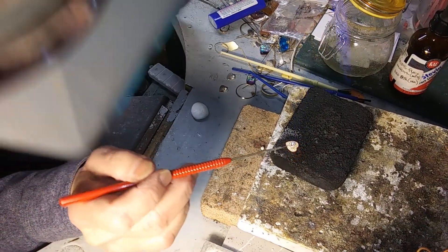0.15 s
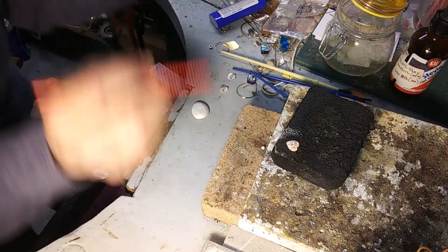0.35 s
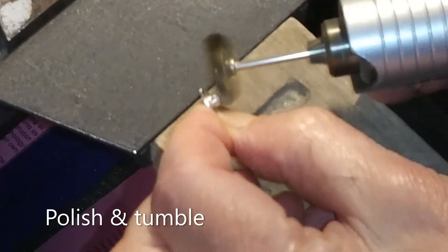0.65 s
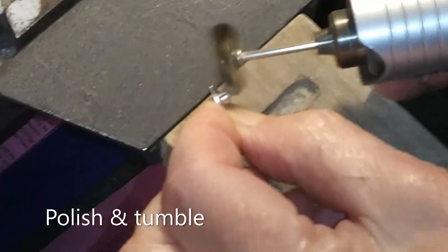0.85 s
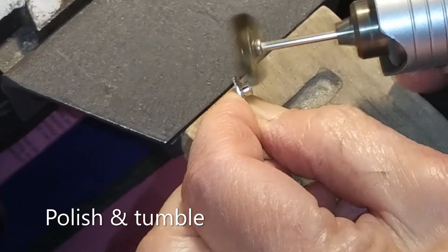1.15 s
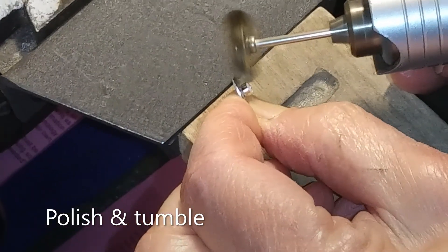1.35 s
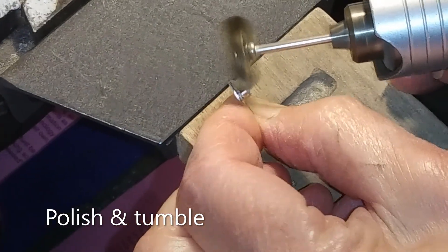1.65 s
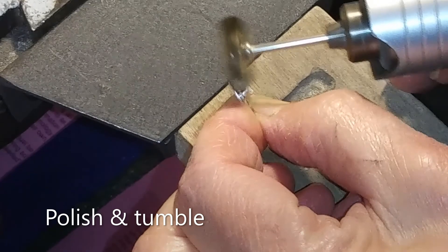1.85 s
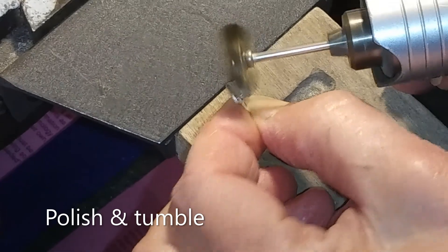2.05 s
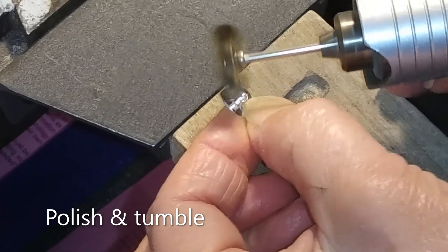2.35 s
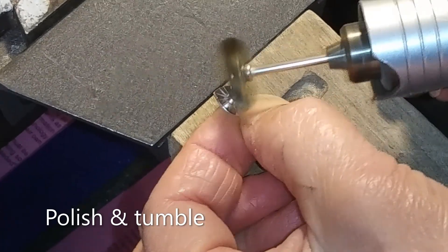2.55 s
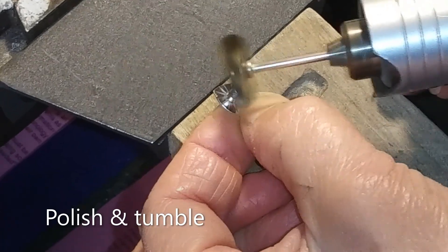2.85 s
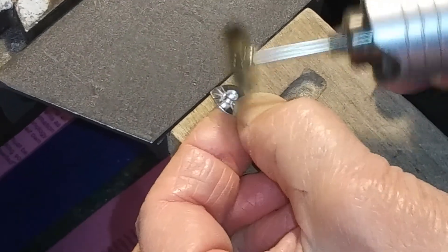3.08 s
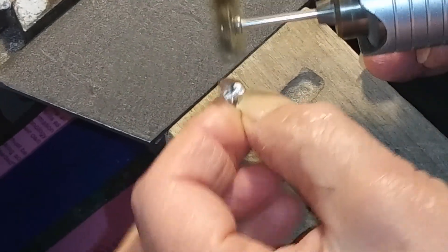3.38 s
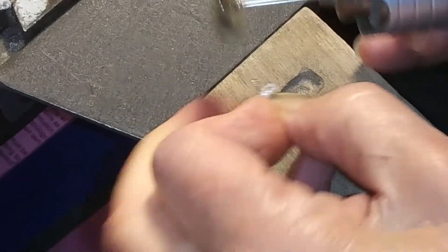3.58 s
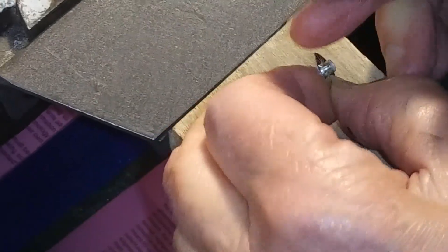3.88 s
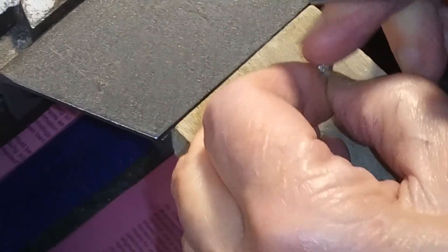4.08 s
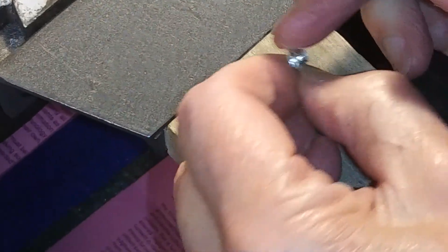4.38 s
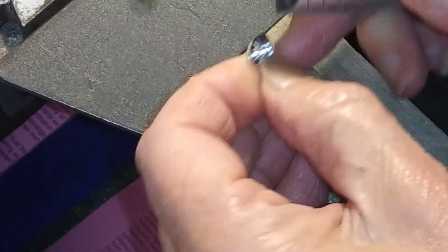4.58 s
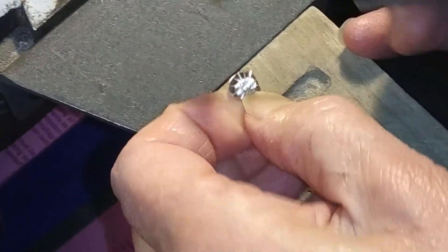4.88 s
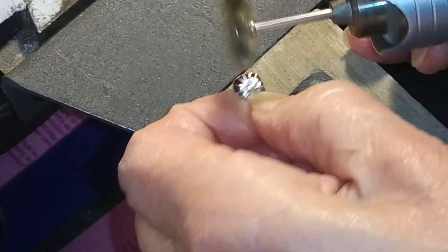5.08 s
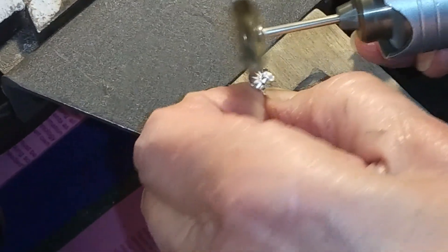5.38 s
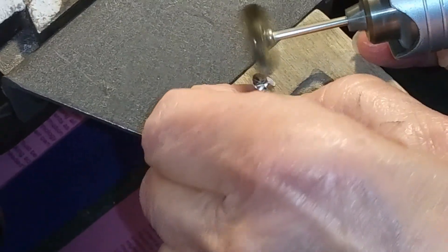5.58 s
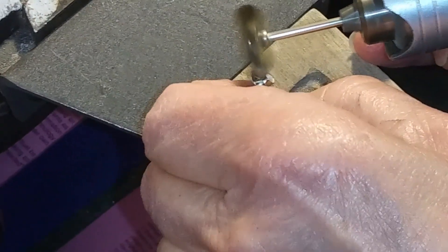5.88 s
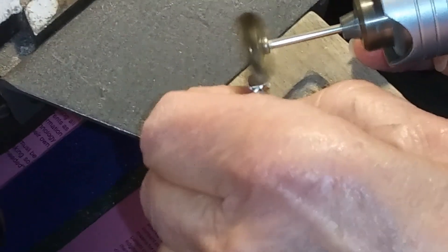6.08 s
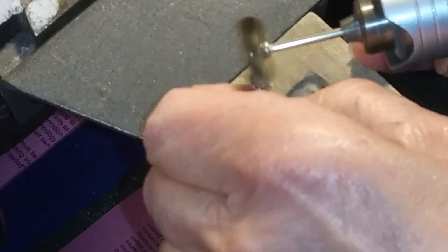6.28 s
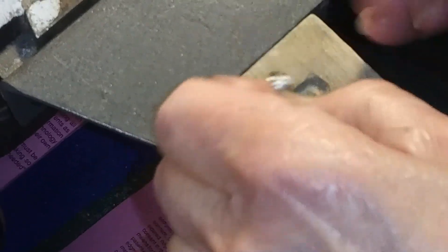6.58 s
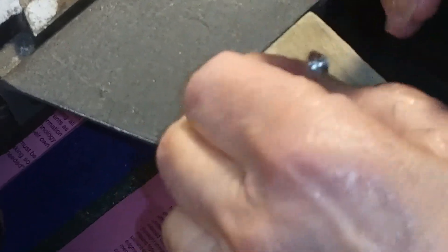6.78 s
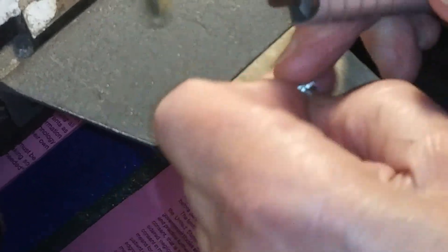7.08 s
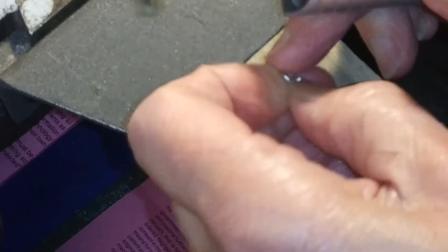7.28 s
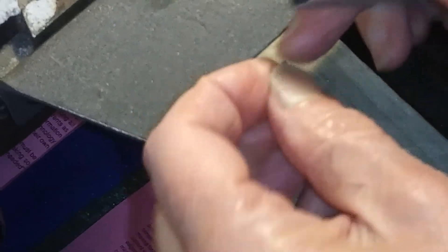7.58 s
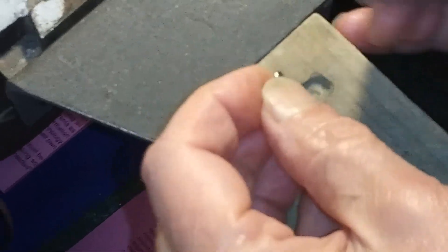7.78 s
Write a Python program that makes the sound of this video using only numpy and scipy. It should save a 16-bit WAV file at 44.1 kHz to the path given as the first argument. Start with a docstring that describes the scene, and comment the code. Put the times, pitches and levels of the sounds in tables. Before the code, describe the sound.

Brief whistling torch hiss gives way to a steady, bright rotary-tool whine that coasts lower, climbs partway again and glides down, with soft knocks.

```python
"""A pedal-driven flexible-shaft tool spins a small brush against a silver setting on a jeweller's bench.
Its motor buzzes with bursts of mains current, coasts, is driven again and coasts; noise and tones locked
to the shaft angle ring the housing, the bearings, the spindle, the brush and the sheath.
Dull knocks, made of decaying modes, fall in between. Before the tool, a gas torch rushes for half a second:
coloured noise with thin, wavering whistles."""
import sys
import numpy as np
from scipy import signal
from scipy.fft import rfft, irfft, next_fast_len
from scipy.io import wavfile
from scipy.ndimage import uniform_filter1d

SR = 44100
rng = np.random.default_rng(int(sys.argv[2]) if len(sys.argv) > 2 else 0)


def transcribe(u):
    """Save the signal u as a 16-bit wav file named by the first command-line argument.

    u: samples, shape (n,) or (channels, n), limited to [-1, 1]; the rate is SR.
    q: integer samples, one column per channel.
    """
    v = np.clip(np.atleast_2d(u).T, -1, 1)
    q = np.round(v * 32767).astype(np.int16)
    wavfile.write(sys.argv[1], SR, q)


N = 350154
TIME = np.arange(N) / SR
FULL_SPEED = 91.55   # turns per s


def from_db(db):
    """Decibels to gain."""
    return 10 ** (np.asarray(db) / 20)


def rms_one(x):
    """Scale to unit power."""
    return x / np.sqrt(np.mean(x ** 2) + 1e-20)


def in_time(rows):
    """Each column of a curve, at every sample."""
    s, *columns = np.transpose(rows)
    return [np.interp(TIME, s, column) for column in columns]


def held(rows, ramp_s):
    """Sum of rows (from s, to s, strength): each ramps up, holds and ramps down."""
    total = np.zeros(N)
    for start, end, strength in rows:
        to_edge_s = np.minimum(TIME - start, end - TIME)
        total += strength * np.clip(to_edge_s / ramp_s + .5, 0, 1)
    return total


def drift(rate_hz):
    """Smooth random curve of spread 1 that changes about rate_hz times a second."""
    step = 40   # samples between points of the curve
    r = np.exp(-2 * step * np.pi * rate_hz / SR)
    noise = rng.standard_normal(N // step + 2002)
    slow = signal.lfilter([1], [1, -2 * r, r * r], noise)[2000:]
    return np.interp(np.arange(N) / step, np.arange(len(slow)), rms_one(slow))


def colour(x, spectrum, peaks=()):
    """Filter by a spectrum (Hz, dB), 60 dB per octave steeper outside it, plus peaks (Hz, width Hz, dB)."""
    size = next_fast_len(N + 4096)
    hz = np.maximum(np.arange(size // 2 + 1) * SR / size, 1)
    points_hz, levels_db = np.transpose(spectrum)
    db = np.interp(np.log(hz), np.log(points_hz), levels_db)
    db -= 60 * np.abs(np.log2(hz / np.clip(hz, points_hz[0], points_hz[-1])))
    for centre_hz, width_hz, gain_db in peaks:
        db += gain_db / (1 + (2 * (hz - centre_hz) / width_hz) ** 2)
    return irfft(rfft(x, size) * from_db(db), size)[:N]


def tones(turns, rows, size=65536):
    """Partials (multiple of the speed, dB) locked to a shaft's angle; the pattern recurs every ten turns."""
    multiple, db = np.transpose(rows)
    lines = np.zeros(size // 2 + 1, complex)
    random_phase = np.exp(2j * np.pi * rng.random(len(db)))
    lines[np.round(10 * multiple).astype(int)] = from_db(db) * random_phase
    pattern = irfft(lines) * size / np.sqrt(2)
    return np.interp(turns / 10 % 1 * size, np.arange(size), pattern)


def swelling(turns, rows, flutter_db, count=4):
    """Partials dealt into groups, each with its own random swell."""
    total = np.zeros(N)
    for k in range(count):
        swell_db = flutter_db * np.clip(drift(14), -2.5, 1.2)
        total += from_db(swell_db) * tones(turns, rows[k::count])
    return total


def level_at(speed, full_speed_db, db_per_doubling):
    """A level in dB that follows the logarithm of speed."""
    return full_speed_db + db_per_doubling * np.log2(speed / FULL_SPEED)


def torch(flame_db=-31, flutter_db=0.5, waver_hz=2.4, whistle_flutter_db=0.2):
    """Turbulent gas rushes from the nozzle, whose edge whistles."""
    # Each row: Hz, dB per Hz.
    spectrum = [(53, -65), (90, -31.5), (259, -5.5), (321, -7.5), (494, 0), (1270, -2), (1360, -2),
                (1650, -4.5), (2380, -18), (2890, -5.5), (3360, -19.5), (3900, -22), (4740, -17),
                (5280, -25), (10000, -28.5), (15500, -39)]
    # Extra flame peaks. Each row: centre in Hz, width in Hz, gain in dB.
    flame_peaks = [(503, 160, 1), (1315, 240, -13.5), (1620, 520, 8), (2420, 270, 5.5), (3030, 340, -2.5),
                   (3850, 820, 9)]
    # Each row: Hz, level in dB.
    whistles = [(1244, -46.5), (2902.5, -37), (4354, -61)]
    rush = rms_one(colour(rng.standard_normal(N), spectrum, flame_peaks))
    sound = from_db(flame_db + flutter_db * drift(25)) * rush
    for hz, db in whistles:
        phase = 2 * np.pi * np.cumsum(hz + waver_hz * drift(30)) / SR
        gain = from_db(db + whistle_flutter_db * drift(28))
        sound += np.sqrt(2) * gain * np.sin(phase)
    return sound


def knocks(contact_s=0.0031, low_cut_hz=640.0):
    """Soft blows set a few low modes ringing; the body is too small to radiate bass."""
    # Each row: time in seconds, strength in dB.
    blow_rows = [(3.189, -21), (3.762, -34.5), (4.735, -44), (5.095, -44), (5.376, -37.5), (6.493, -32),
                 (6.545, -40), (7.854, -41)]
    # Each row: mode in Hz, relative level in dB, 60 dB decay time in seconds.
    modes = [(613, -9, 0.19), (696, 6.5, 0.067), (732, -7, 0.15), (900, -10, 0.046)]
    blows, out = np.zeros(N), np.zeros(N)
    for s, db in blow_rows:
        blows[round(s * SR)] = from_db(db)
    for hz, db, t60_s in modes:
        w = 2 * np.pi * hz / SR
        ring_r = from_db(-60 / (t60_s * SR))
        contact_r = np.exp(-1 / (contact_s * SR))
        # subtracting a faster decay makes the ring build up during the contact
        for share, r in ((0.73, ring_r), (-0.57, contact_r)):
            ring = signal.lfilter([0, np.sin(w)], [1, -2 * r * np.cos(w), r * r], blows + 1e-18)
            out += share * from_db(db) * ring
    return signal.sosfilt(signal.butter(3, low_cut_hz, "high", fs=SR, output="sos"), out)


def thrum(turns, force, full_force_db=-58):
    """Under load the bent shaft shakes the bench twice a turn."""
    return from_db(full_force_db) * force * np.sqrt(2) * np.sin(4 * np.pi * turns)


def sheath(turns, coasting, flutter_db=4.5, coasting_db=-59.5, driven_db=-60.5, ramp_s=0.087):
    """Slow bearing tones swell as they glide through the sheath's resonances, more when the shaft coasts."""
    # Each row: multiple of the speed, relative level in dB.
    slow_tones = [(17.7, 0), (20.9, -2), (28.7, -4), (39.4, -3), (54.4, -3)]
    # Sheath resonances. Each row: Hz, dB.
    resonances = [(1040, -24), (1140, -5), (1290, 0), (1380, -12), (1600, -16), (1760, 0), (1900, -20),
                  (2550, -30), (2750, -14), (2860, 2), (3000, -16), (3600, -28), (3850, -14), (3960, 2),
                  (4080, -16)]
    # The sheath sings out. Each row: start in seconds, end in seconds, added gain in dB.
    swells = [(4.624, 4.8, -55.5), (6.72, 7.157, -52)]
    gain = from_db(driven_db + coasting * (coasting_db - driven_db))
    gain = gain + held([(start, end, from_db(db)) for start, end, db in swells], ramp_s)
    return gain * from_db(flutter_db * drift(15.6)) * colour(tones(turns, slow_tones), resonances)


def brush_shudder(speed, coasting, critical_speed=65.4, half_width=6.1):
    """Coasting through its critical speed (turns per s), the brush shudders: strength 0-1."""
    return coasting * np.exp(-((speed - critical_speed) / half_width) ** 2)


def squeal(turns, speed, coasting, level_db=-42.0):
    """The shuddering brush sings high tones that sweep down with the speed."""
    # Each row: multiple of the speed, relative level in dB.
    squeal_tones = [(160.3, 0), (155.9, -6), (166.1, -9)]
    return from_db(level_db) * brush_shudder(speed, coasting) * tones(turns, squeal_tones)


def hiss_dips(db_per_s=1050, shortest_s=.008):
    """Gain that drops for a moment at each dip, the longer the deeper."""
    # Each row: centre in seconds, length at half depth in seconds.
    dip_rows = [(0.872, .017), (0.934, .019), (1.384, .02), (2.237, .019), (3.497, .019), (3.54, .015),
                (3.857, .018), (4.17, .016), (4.393, .019), (4.523, .014), (4.692, .045), (5.67, .018),
                (5.713, .016), (5.846, .015), (5.905, .015), (6.055, .016), (6.163, .018), (6.202, .016),
                (6.793, .03), (6.897, .027), (6.994, .017), (7.125, .015), (7.166, .016), (7.225, .015),
                (7.292, .015)]
    loss_db = np.zeros(N)
    for s, length_s in dip_rows:
        fourth_power = np.square(np.square(2 * (TIME - s) / length_s))
        shape = np.exp(-np.minimum(fourth_power, 20) * np.log(2))
        loss_db += db_per_s * (length_s - shortest_s) * shape
    return from_db(-loss_db)


def race_tones(turns, pit_db=-23.5, pit_tilt_db=-6.5, pit_flutter_db=2.5, count=130):
    """The balls find small pits: faint tones that come and go, weaker with every octave."""
    multiple = rng.uniform(45, 200, count)
    db = pit_db + pit_tilt_db * np.log2(multiple / 80)
    return swelling(turns, np.column_stack([multiple, db]), pit_flutter_db)


def handpiece_levels(speed, force, coasting, pressed_db=2.5, shudder_db=3):
    """Levels in dB of bearings, spindle, brush and brush edge, from time, speed and load."""
    # Spindle ring. Each row: time in seconds, level in dB.
    spindle_ring = [(1.6, -47), (2, -41.5), (3.6, -39.5), (4.5, -43.5), (4.9, -42), (6.9, -41), (7.1, -45)]
    return [level_at(speed, -37.5, -8),
            in_time(spindle_ring)[0] + pressed_db * force ** 2,
            level_at(speed, -39, 8.5) + shudder_db * brush_shudder(speed, coasting),
            level_at(speed, -40, 12.6)]


def handpiece(turns, speed, levels_db, dips, throb=0.047, count=10):
    """Balls roll over pitted races: noise and gliding tones ring the bearings, spindle and brush."""
    # Each row: multiple of the speed, relative level in dB; the first ten hold through the dips.
    bearing_tones = [(67.3, -3), (78.7, -7), (96.3, -6), (111.6, -5), (118.6, -8), (142.8, -6), (156.6, -7),
                     (160.3, -4), (166.2, -7), (103.6, -8), (75.1, -6), (87.7, -8), (52.2, -12),
                     (58.7, -12), (63.2, -13), (64.3, -11), (65.3, -9), (66.3, -9), (72.5, -11),
                     (76.4, -11), (77.7, -10), (82.9, -9), (85.3, -11), (89.7, -11), (92.1, -9),
                     (93.2, -11), (98.5, -9), (107.5, -9), (121.7, -9), (127.6, -9), (132.1, -9),
                     (134.7, -8), (145.3, -9), (175, -3), (69.8, -13)]
    # Strength of the bearing tones. Each row: time in seconds, gain.
    whine_strength = [(.5, .78), (1.5, .72), (1.9, .52), (3.2, .46), (3.7, .36), (4.7, .32), (5.2, .16),
                      (6, .3), (6.5, .33), (7.2, .31), (7.9, .13)]
    # Spectra of the four ringing parts. Each row: Hz, dB per Hz.
    bearings = [(3000, -121.5), (4300, -9.5), (5000, -2.5), (5650, -1.5), (5950, 4), (6250, 5), (6500, 3),
                (6850, 8.5), (7250, 6.5), (7650, 3.5), (8050, -17), (9500, -38)]
    spindle = [(8200, -13), (8450, -5.5), (8640, 3.5), (8830, -9), (9200, -9.5)]
    brush = [(8600, -43), (9150, -1), (9600, 11), (10300, 14), (10900, 12.5), (11400, -33), (12200, -55)]
    brush_edge = [(10500, -36), (11300, 3), (11900, -4), (12500, 2.5), (12750, -6), (13100, -5),
                  (13450, -6), (14000, -18), (14800, -10), (15700, -14)]
    # the tones carry best where the outer race resonates: (Hz, dB)
    outer_race = [(3000, -23), (4400, 3.5), (4770, 5.5), (5200, -2), (5700, 6.0), (6170, 4), (6450, 10.0),
                  (6900, 2), (7500, -3.5), (8100, -6.0), (8600, -4), (9300, -5.5), (10300, -6.5),
                  (11200, -5.0), (16000, -23)]
    # steadier at full speed, in dB over turns per s
    flutter_db = np.interp(speed, [82, FULL_SPEED], [2.2, 1])
    strong = swelling(turns, bearing_tones[:count], flutter_db)
    faint = swelling(turns, bearing_tones[count:], flutter_db)
    strength, = in_time(whine_strength)
    whine = strength * (strong + dips * faint) + dips * race_tones(turns)
    rolling = colour(whine, outer_race) + dips * rng.standard_normal(N)
    rolling *= 1 + throb * np.sin(2 * np.pi * turns)   # the bent shaft loads the bearings once a turn
    sound = np.zeros(N)
    for db, body in zip(levels_db, (bearings, spindle, brush, brush_edge)):
        sound += from_db(db) * rms_one(colour(rolling, body))
    return sound


def motor(turns, speed, dips, flutter_db=-0.27, hum_flutter_db=-0.5, tone_flutter_db=1.7):
    """Hum of the rotor, commutator noise and tones in the housing, and a low rush of air."""
    # Each row: multiple of the speed, relative level in dB.
    hum_tones = [(6, -58), (12, -52.5), (14, -60.5)]
    # Resonance that the hum glides through. Each row: centre in Hz, width in Hz, gain in dB.
    hum_peaks = [(983, 7.9, 15.5)]
    # Each row: multiple of the speed, dB against the noise before the armature's filter.
    motor_tones = [(25, -16), (26, -23), (27, -25), (31, -25), (32, -22), (33, -18), (34, -19.5), (35, -21),
                   (36, -20), (37, -25), (38, -19.5), (39, -21), (40, -22), (41, -20.5), (42, -21),
                   (43, -17), (44, -20), (45, -22), (47, -22), (49, -19)]
    # Spectra of the housing and of the motor's air. Each row: Hz, dB per Hz.
    housing_body = [(700, -9.5), (1000, -6), (1130, -7.5), (1290, -2.5), (1430, -7), (1580, 3), (2070, 1),
                    (2200, -3), (2680, -4), (2880, 0), (3400, 2), (3950, 0.5), (4400, -3), (5500, -3.5)]
    air_spectrum = [(70, -26), (120, -22), (180, -7.5), (260, -3.5), (310, 4.5), (420, -2), (540, 4),
                    (660, -1), (800, -14), (1100, -52), (1400, -25)]
    hum_body = [(450, -10), (520, -3), (550, 0.5), (2000, 2.0)]   # (Hz, dB)
    armature = [(1500, -17), (1980, -27), (2080, 2.5), (2170, -33), (2400, -25), (2700, -8), (2880, 4.0),
                (3100, -1.0), (4000, -6.5), (4600, -18)]   # (Hz, dB)
    hum_gain = from_db(level_at(speed, -0.5, 24.5) + hum_flutter_db * drift(4.0))
    hum = hum_gain * colour(tones(turns, hum_tones), hum_body, hum_peaks)
    whine = colour(swelling(turns, motor_tones, tone_flutter_db), armature)
    whine *= from_db(level_at(speed, 0, 3))   # stands out of the noise as the motor speeds up
    rubbing = dips * (rng.standard_normal(N) + whine)
    housing_gain = from_db(level_at(speed, -37.5, 7.26) + flutter_db * drift(26.0))
    housing = housing_gain * rms_one(colour(rubbing, housing_body))
    air_gain = from_db(level_at(speed, -56.5, 2.1) + flutter_db * drift(3.6))
    air = air_gain * rms_one(colour(rng.standard_normal(N), air_spectrum))
    return housing + dips * (hum + air)


def buzz(turns, speed, pedal, buzz_db=-39, mains_hz=60, slots=24, sharpness=2.4, narrowing=16.0,
         back_share=0.69, spark_db=0.0, ring_db=-1.5, uneven_db=0.3):
    """A strong and a weak burst of current per mains cycle make the armature's slots sing and sparks rasp."""
    # Sparks rasp in the brush holders. Each row: Hz, dB per Hz.
    rasp_spectrum = [(1450, -14), (1600, -9), (2050, 2), (2200, -28), (2700, -16), (2880, 4), (3400, 2.5),
                     (3900, -10)]
    stator = [(1400, -10), (1550, 8), (1650, 9.5), (1770, 8), (1830, -7), (2080, 4), (2135, 10),
              (2200, -6.0), (2260, -1.0), (2320, 1.5), (2400, -8)]   # (Hz, dB)
    mains = np.sin(2 * np.pi * mains_hz * TIME)
    opening = np.clip(pedal, .45, 1)   # a lighter pedal cuts the bursts shorter
    bursts = np.abs(mains) ** (sharpness + narrowing * (1 - opening))
    half_cycle_gain = np.where(mains > 0, 1, back_share * opening)
    current = bursts * half_cycle_gain * from_db(uneven_db * drift(50))
    slot_tone = np.sqrt(2) * np.sin(2 * np.pi * slots * turns)
    # a motor driven below full speed sparks more
    sparks = from_db(level_at(speed, spark_db, -24)) * rng.standard_normal(N)
    sound = colour(current * (slot_tone + sparks), stator)
    # one sharp mode of the casing rings on between the bursts
    ringing = signal.lfilter(*signal.iirpeak(2077, 50, fs=SR), sound)
    sound = sound + from_db(ring_db) * ringing
    running_rms = np.sqrt(uniform_filter1d(sound ** 2, size=8820) + 1e-12)   # over 0.2 s
    rasp_noise = rms_one(colour(current * rng.standard_normal(N), rasp_spectrum))
    rasp = from_db(level_at(speed, -51, -26)) * rasp_noise
    return pedal * (from_db(buzz_db) * sound / running_rms + rasp)


def rotary_tool(snag=0.001024, cogging=0.000098, idle_current=0.087):
    """Pedal, speed and the force on the brush drive every part of the tool."""
    # Motor speed. Each row: time in seconds, turns per second.
    speed_curve = [(1.15, 92.2), (1.55, 91.55), (3.2, 91.55), (3.45, 86.8), (3.75, 82.2), (3.95, 77.3),
                   (4.2, 71), (4.7, 60.9), (5.15, 54.8), (5.33, 55.4), (5.8, 68.4), (6.05, 73.3),
                   (6.4, 77.8), (6.5, 80.6), (6.6, 77.3), (6.8, 72.6), (7.2, 64.3), (7.5, 58), (7.94, 52.2)]
    # The shaft winds and unwinds as the brush catches. Each row: time in seconds, swing as a share of speed.
    twist_swing = [(.7, .006), (1.4, .0025), (1.7, .006), (1.95, .015), (2.25, .003), (2.6, .02),
                   (2.9, .018), (3.1, .014), (3.6, .007), (5, .003), (5.6, .009), (6.7, .007), (7.9, .004)]
    # The pedal is held down. Each row: start in seconds, end in seconds, current 0-1.
    pedal_rows = [(0.3, 0.993, 0.76), (1.004, 3.22, 1), (3.22, 3.784, 0.46), (5.594, 6.22, 0.55),
                  (6.229, 6.534, 0.73)]
    # The brush is pressed on the silver. Each row: start in seconds, end in seconds, force 0-1.
    presses = [(0.3, 1.8, 0.4), (1.8, 2.7, 0.36), (2.42, 2.97, 0.62), (2.95, 3.5, 0.2), (6.15, 6.7, 0.11)]
    pedal_ramp_s, press_ramp_s = 0.03, 0.2
    twist_hz, twist_crest_s = 5.63, 2.605
    catch_s, catch_lead_s = 3.04, .047   # the brush catches once and jerks the twist ahead

    (speed,), (swing,) = in_time(speed_curve), in_time(twist_swing)
    pedal, force = held(pedal_rows, pedal_ramp_s), held(presses, press_ramp_s)
    driven = np.minimum(held([(down, up, 1) for down, up, _ in pedal_rows], pedal_ramp_s), 1)
    coasting = 1 - driven
    twist_time = TIME - twist_crest_s + catch_lead_s * (TIME > catch_s)
    twist = swing * np.cos(2 * np.pi * twist_hz * twist_time)
    motor_turns = np.cumsum(speed * (1 + cogging * drift(30))) / SR
    slowness = 1 - speed / FULL_SPEED
    pulling = (1 - coasting) * slowness
    slip = (.0008 + .003 * slowness + .01 * pulling) * drift(90)   # share of the speed
    # the shaft snags in its sheath, the balls slip
    brush_turns = np.cumsum(speed * (1 + twist + snag * drift(6.4) + slip)) / SR

    dips = hiss_dips()
    current = pedal + idle_current * coasting * dips
    levels_db = handpiece_levels(speed, force, coasting)
    sound = motor(motor_turns, speed, dips)
    sound += thrum(motor_turns, force)
    sound += buzz(motor_turns, speed, current)
    sound += handpiece(brush_turns, speed, levels_db, dips)
    sound += sheath(brush_turns, coasting)
    return sound + squeal(brush_turns, speed, coasting)


def scene():
    """The torch fades out as the tool fades in and swells to its full level; both channels are alike."""
    torch_end_s, torch_fade_s = 0.5135, 0.04
    tool_start_s, tool_fade_s, tool_swell_db, tool_swell_s = 0.51, 0.04, 16, 0.12
    fade_out = np.clip((torch_end_s - TIME) / torch_fade_s, 0, 1) ** 2
    since_s = np.maximum(TIME - tool_start_s, 0)
    swell = from_db(-tool_swell_db * np.exp(-since_s / tool_swell_s))
    fade_in = np.minimum(since_s / tool_fade_s, 1) ** 2 * swell
    mono = fade_in * (rotary_tool() + knocks()) + fade_out * torch()
    return np.tile(mono, (2, 1))


def record(dry):
    """A steep elliptic low-pass cuts the top."""
    cutoff_hz = 15750
    return signal.sosfilt(signal.ellip(12, .1, 90, cutoff_hz, fs=SR, output="sos"), dry)


dry = scene()
out = record(dry)
transcribe(out)
```